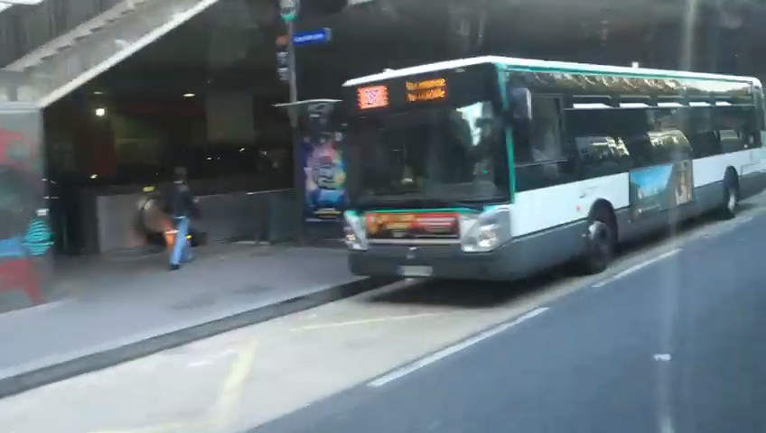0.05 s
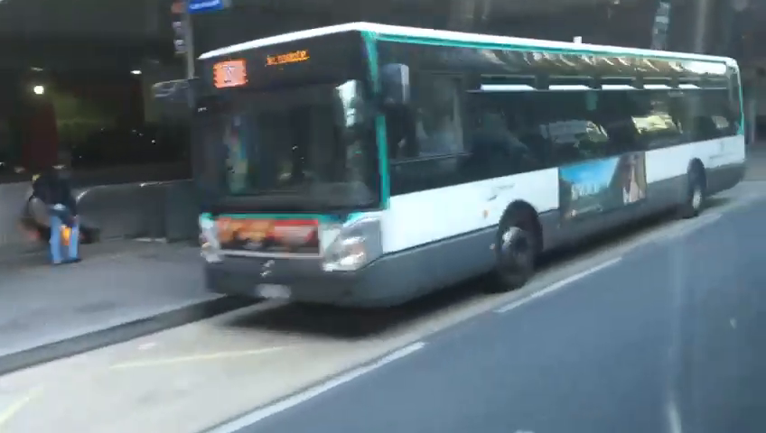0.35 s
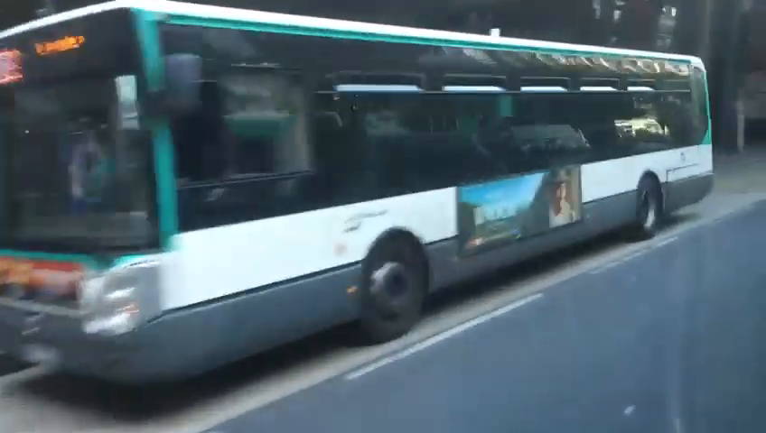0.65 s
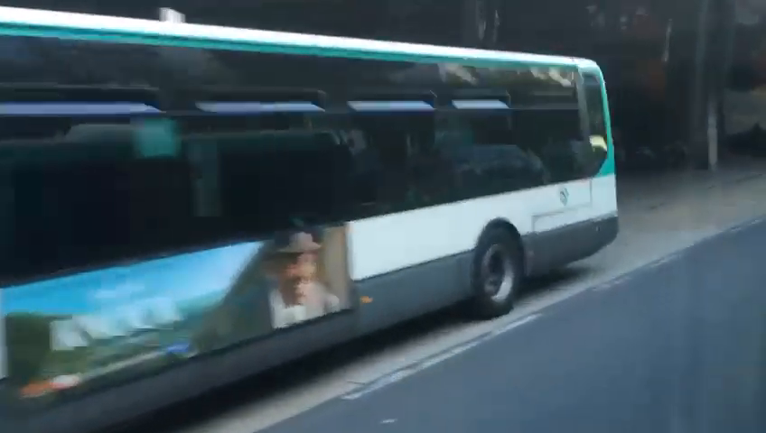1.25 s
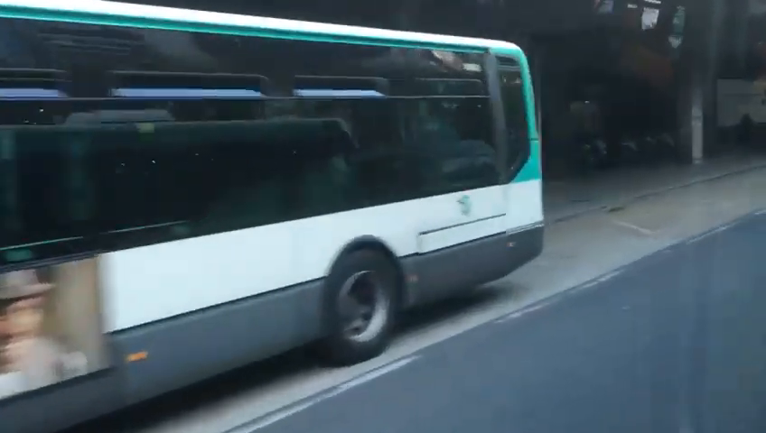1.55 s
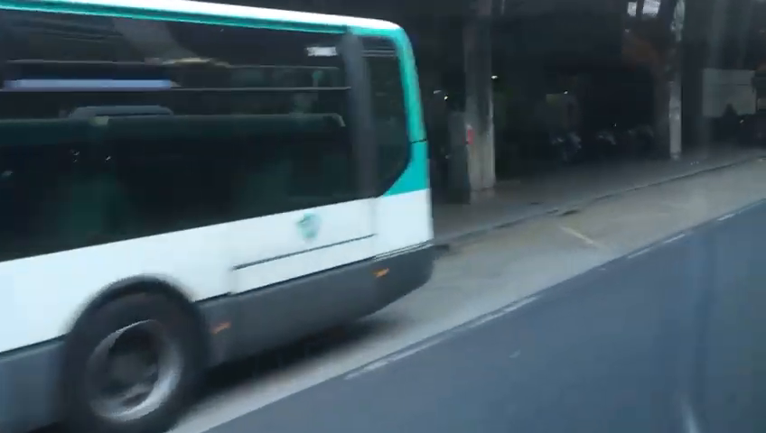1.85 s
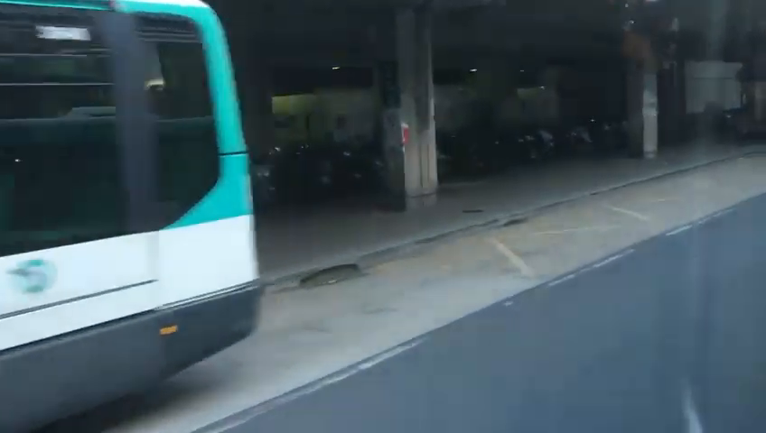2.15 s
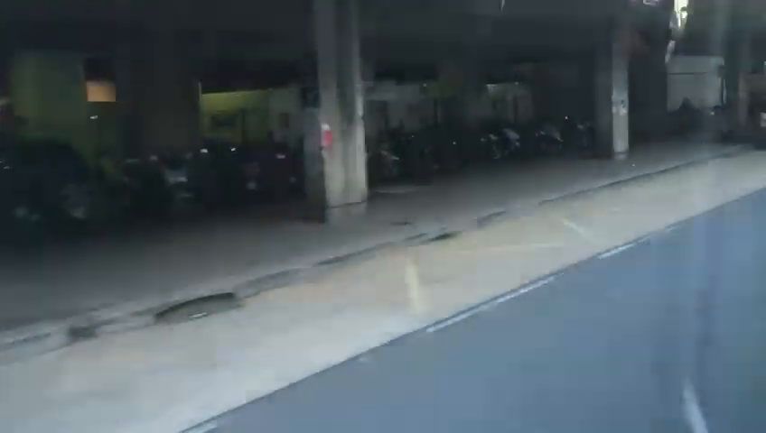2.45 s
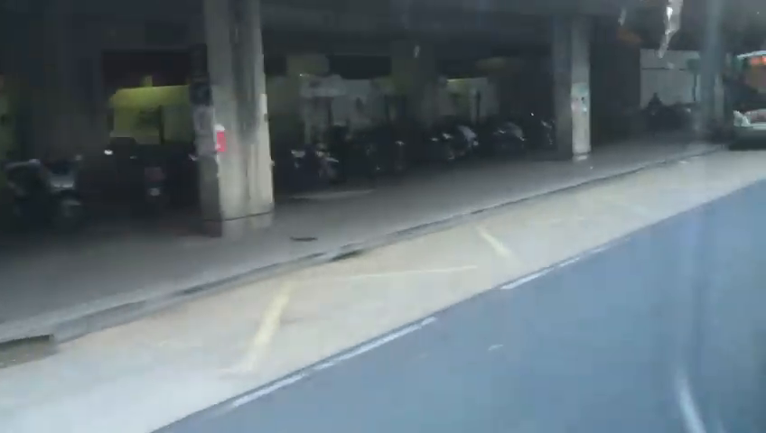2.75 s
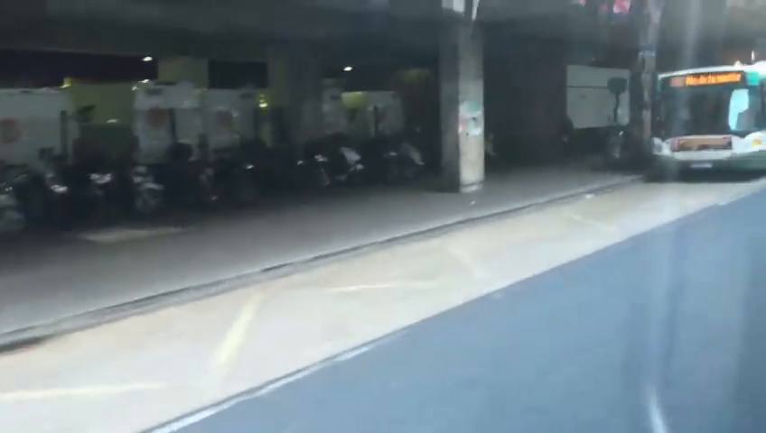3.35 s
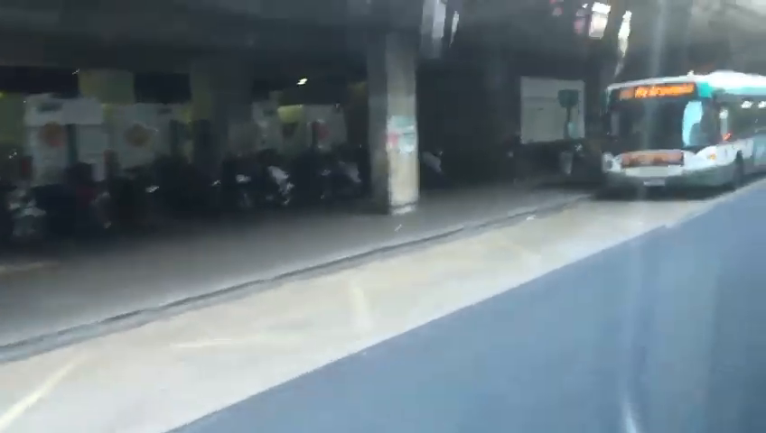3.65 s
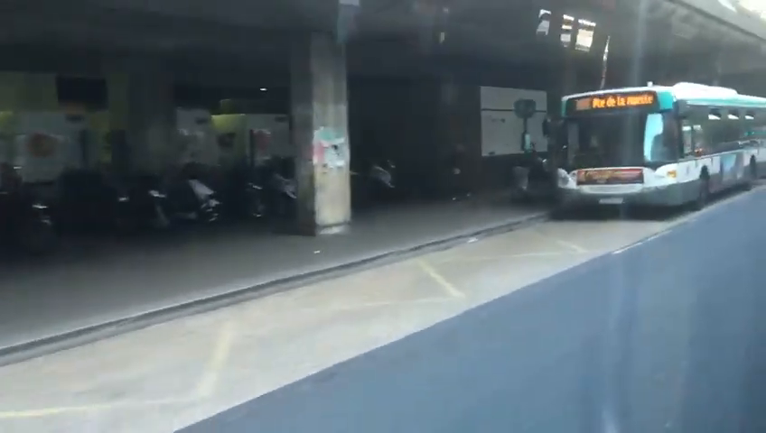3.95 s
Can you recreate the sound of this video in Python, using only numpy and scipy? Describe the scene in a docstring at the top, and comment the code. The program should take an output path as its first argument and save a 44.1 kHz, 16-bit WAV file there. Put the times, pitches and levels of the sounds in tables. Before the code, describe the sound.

A bus engine booms and the road rumbles, heard from inside, with small rattles.

```python
"""A deep engine boom and the rumble of the road fill a city bus that is gently slowing down.
The engine's tones and a thin gear whine sink with the speed, and the cabin makes some pitches louder.
Tyres roar outside. Uneven asphalt jolts the body and shakes the fittings; a panel knocks and creaks.
Trim scuffs, short soft hisses of air come and go, and a fan drones at its own steady pitch."""
import sys
import numpy as np
from scipy.fft import rfft, irfft, next_fast_len
from scipy.io import wavfile
from scipy.ndimage import map_coordinates

SR = 44100
rng = np.random.default_rng(int(sys.argv[2]) if len(sys.argv) > 2 else 0)


def bounce(signal):
    """Save signal as a 16-bit WAV file at the path given by the first command-line argument."""
    frames = np.transpose(np.atleast_2d(signal))
    limited = np.clip(frames, -1, 1)
    pcm = np.round(limited * 32767).astype(np.int16)
    wavfile.write(sys.argv[1], SR, pcm)


N = 176400

# how often the engine fires: time_s, rate_hz
FIRING_RATE = [(0, 52.28), (0.35, 51.23), (0.5, 50.84), (1, 49.75), (1.5, 48.63), (2, 47.48), (2.5, 46.44),
               (3, 45.11), (3.2, 44.7), (3.5, 43.45), (3.75, 41.73), (4, 39.84)]
# boom at the firing rate: time_s, level_db
ENGINE_BOOM = [(0, -17.5), (0.1, -17.5), (0.45, -20), (0.74, -17.5), (0.86, -33), (0.96, -45), (1.1, -23.5),
               (1.8, -27.5), (2.35, -25), (2.6, -28), (2.72, -30), (2.83, -20), (2.98, -33), (3.12, -25.5),
               (3.35, -21.5), (3.95, -24)]
# drone of the driveline, which turns the wheels: time_s, level_db
DRIVELINE_DRONE = [(0, -37), (0.8, -29), (1.6, -27), (2.3, -26), (2.6, -25), (2.75, -32), (2.92, -21),
                   (3.05, -16.5), (3.18, -25.5), (3.4, -21.5), (3.52, -27), (3.7, -19), (3.95, -26)]
# hum of the gearbox: time_s, level_db
GEARBOX_HUM = [(0, -39.5), (.3, -39.5), (.58, -37.5), (.8, -42.5), (1, -46), (1.2, -60), (2.1, -49.5),
               (2.5, -44.5), (3.2, -44.5), (3.7, -37.5), (4, -46)]
# lower singing of meshing gears: time_s, level_db
GEAR_SINGING = [(0, -69), (.45, -54), (.7, -45.5), (1.1, -42.5), (1.45, -53.5), (1.8, -43), (2.15, -42),
                (2.4, -77), (4, -54)]
# thin, high gear whine: time_s, level_db
GEAR_WHINE = [(0, -47.5), (.35, -49.5), (.52, -53.5), (.85, -50), (1.2, -56.5), (1.45, -55.5), (1.7, -60),
              (2.1, -65), (2.45, -54), (2.95, -72), (3.15, -51.5), (3.33, -51.5), (3.48, -46), (3.6, -74),
              (3.73, -40.5), (3.83, -66)]
# weaker engine tones: times_firing_rate, fastest_db, slowest_db
WEAK_TONES = [(1.2, -41.5, -46), (1.4, -29, -46.5), (1.6, -33.5, -29), (2, -51.5, -24.5),
              (2.74, -53.5, -33), (3, -44.5, -54), (3.2, -40, -67), (3.39, -45.5, -36), (3.68, -54, -54),
              (4.25, -58, -36), (5.2, -61, -60), (5.49, -64, -45.5), (5.78, -44.5, -64.5), (6.4, -66, -45),
              (7.31, -75, -46), (8.22, -77, -42.5), (9.57, -57, -44), (10.98, -54, -68),
              (11.56, -68, -50.5), (13.64, -56, -47.5), (17, -61, -64), (18.25, -54.5, -65.5)]
# pitches the cabin lifts or sinks: pitch_hz, width_hz, lift_db
CABIN_RESONANCES = [(149, 3.4, 11), (246.8, 6.6, 12), (275.07, 7.2, 10.5), (329, 12, -7), (372.4, 4.2, 12),
                    (389, 3.59, 2), (424, 7.1, -9), (467, 3.3, 9.5), (497, 18, 6.5), (544, 5, 6),
                    (626, 4.4, 6), (649, 2.5, 6), (783, 24.16, 13)]

# how rough the road is: time_s, roughness_db
ROAD_ROUGHNESS = [(0, 0), (.7, -1), (1.6, -0.5), (1.95, -0.5), (2.35, -0.5), (2.7, 1.5), (3.6, 0.35),
                  (4, -2)]
# soft rush of air: time_s, level_db
AIR_RUSH = [(0, -57.5), (.45, -62), (.85, -60), (1.15, -58.5), (1.9, -59), (2.4, -60), (2.7, -57.5),
            (3.2, -58.5), (4, -59)]
# bumps in the asphalt: peak_s, thud_db, rattle_db
ROAD_JOLTS = [(.09, -56, -34.5), (1.893, -33, -39), (1.948, -29, -52), (2.045, -30.5, -42),
              (2.161, -29.5, -36), (2.52, -25, -39), (2.61, -30, -44), (2.742, -31, -37.5),
              (3.01, -36, -42)]
# knocks of a loose wall panel: start_s, level_db
PANEL_KNOCKS = [(1.834, -36), (1.893, -30), (1.961, -37), (2.041, -29), (2.155, -39), (2.611, -40),
                (2.737, -30)]
# that panel's ringing tones: pitch_hz, relative_db, fade_s (time to fall 60 dB)
PANEL_TONES = [(445, -6, 0.11), (630, -8, 0.078), (750, -3, .08), (840, -6, 0.066), (1024, -9, 0.044),
               (1300, -15, .07), (1430, -10, .07), (1560, -11, 0.062)]
# panel creaks: peak_s, length_s, pitch_hz, level_db
PANEL_CREAKS = [(0.098, 0.11, 1350, -42.5), (2.07, 0.067, 1590, -49), (3.007, 0.04, 692, -39),
                (3.015, 0.026, 810, -38.5)]
# hisses of air: peak_s, length_s, level_db
AIR_HISSES = [(2.05, 0.051, -59), (2.17, 0.23, -56.5), (2.58, 0.13, -56), (2.77, 0.18, -58.5),
              (2.868, 0.048, -52.5), (3.91, 0.065, -48), (3.98, 0.043, -58)]
# scuffs of trim: peak_s, length_s, level_db
TRIM_SCUFFS = [(3.255, 0.041, -44), (3.92, 0.038, -47)]

# colour (mix of low and high) of the road's rumble: pitch_hz, relative_db
RUMBLE_COLOUR = [(15, -28), (28, -10), (42, -11), (60, -6.5), (78, -1.5), (100, -4.5), (130, -10.5),
                 (180, -17), (300, -31), (600, -68)]
# booming bus body: pitch_hz, relative_db
BODY_COLOUR = [(80, -8), (150, 3), (215, 7), (290, -2.5), (380, -9), (600, -15.5), (1200, -45.5)]
# roaring tyres: pitch_hz, relative_db
TYRE_COLOUR = [(150, -24), (350, 3.5), (620, 1), (820, -3.5), (1050, -2), (1180, -5.5), (1340, -4.5),
               (1900, -9.5), (2950, -15.5), (3800, -22), (5000, -47), (8000, -51)]
# rushing air: pitch_hz, relative_db
AIR_COLOUR = [(2470, -48), (4200, 2.5), (4500, 2.5), (5000, -4), (6040, 1), (7750, -4.5), (8950, -1),
              (10400, -5.5), (11200, -2.5), (11900, -15), (15500, -41), (22000, -120)]
# thud of the jolted body: pitch_hz, relative_db
THUD_COLOUR = [(60, -3), (140, -15), (220, 6), (320, -13), (450, -12.5), (700, -12.5), (1500, -51)]
# loose fittings: pitch_hz, relative_db
RATTLE_COLOUR = [(200, -20), (450, -14), (700, 7), (1100, 17), (1500, -5.5), (2500, 0.5), (4000, -15),
                 (6300, -20), (11000, -28)]
# short hisses: pitch_hz, relative_db
HISS_COLOUR = [(2000, -26), (3500, -1.5), (5000, -3), (6300, 2.5), (7800, -3), (9200, 0.5), (11500, -6)]
# scuffing trim: pitch_hz, relative_db
SCUFF_COLOUR = [(800, -27), (1800, 0), (2800, 11), (3900, 2), (5000, -18), (6500, -8), (11000, -26)]


def engine():
    """Engine and gear tones follow one speed; the weaker ones swell or dip at the cabin's resonances."""
    firing_hz = curve(FIRING_RATE)
    cycles = np.cumsum(firing_hz) / SR
    slowed = (firing_hz.max() - firing_hz) / np.ptp(firing_hz)  # 0 at the fastest, 1 at the slowest
    out = amp(curve(ENGINE_BOOM)) * tone(cycles, waver_db=1, drift_rad=0.13)
    out += amp(curve(DRIVELINE_DRONE)) * tone(1.8 * cycles, waver_db=-0.5, drift_rad=0.16)
    out += amp(curve(GEARBOX_HUM)) * tone(6.81 * cycles, waver_db=1, drift_rad=0.075)
    out += amp(curve(GEAR_SINGING)) * tone(12.79 * cycles, waver_db=-1, drift_rad=0.45)
    out += amp(curve(GEAR_WHINE)) * tone(37.42 * cycles, waver_db=-0.2, drift_rad=0.25)
    for multiple, fastest_db, slowest_db in WEAK_TONES:
        level_db = fastest_db + (slowest_db - fastest_db) * slowed
        pitch_hz = multiple * firing_hz
        lift_db = sum(db / (1 + ((pitch_hz - hz) / width) ** 2) for hz, width, db in CABIN_RESONANCES)
        out += amp(level_db + lift_db) * tone(multiple * cycles, waver_db=3, drift_rad=0.34)
    return out


def road():
    """Floor rumble, body boom and tyre roar grow on rougher asphalt, over a soft rush of air."""
    rough_db = curve(ROAD_ROUGHNESS)
    rumble = amp(-26.5 + 0.43 * rough_db) * noise(RUMBLE_COLOUR)
    body = amp(-36.5 + 1.6 * rough_db + 0.97 * wobble(17)) * noise(BODY_COLOUR)
    tyres = amp(-37 + 0.66 * rough_db + 0.87 * wobble(25)) * noise(TYRE_COLOUR)
    air = amp(curve(AIR_RUSH) + 0.35 * wobble(8.4) + 0.96 * wobble(150)) * noise(AIR_COLOUR)
    return rumble + body + tyres + air


def jolts(rise_s=0.0077, fade_s=0.25):
    """Each bump thuds in the bus body and sets loose fittings chattering."""
    thud, rattle = np.zeros(N), np.zeros(N)
    for peak_s, thud_db, rattle_db in ROAD_JOLTS:
        since_peak = clock() - peak_s
        rise = np.clip(1 + since_peak / rise_s, 0, 1)
        fade = amp(-60 * np.maximum(since_peak, 0) / fade_s)
        thud += amp(thud_db) * rise * fade
        rattle += amp(rattle_db) * rise * fade
    chatter = unit(amp(4.1 * wobble(170)) * noise(RATTLE_COLOUR))
    return thud * noise(THUD_COLOUR) + rattle * chatter


def knocks(rise_s=0.0034, clack_fade_s=0.095):
    """A loose wall panel knocks against its frame several times: a dull clack and a short ring."""
    out, grit = np.zeros(N), noise(RATTLE_COLOUR)
    age = np.arange(SR // 2) / SR
    for start_s, level_db in PANEL_KNOCKS:
        span = round(start_s * SR) + np.arange(len(age))
        ring = np.zeros(len(age))
        for pitch_hz, relative_db, fade_s in PANEL_TONES:
            fade = amp(relative_db + rng.normal(0, 2) - 60 * age / fade_s)
            ring += fade * np.sin(2 * np.pi * (pitch_hz * age + rng.random()))
        clack = amp(-6.5 - 60 * age / clack_fade_s) * grit[span]
        rise = np.minimum(age / rise_s, 1)
        out[span] += amp(level_db) * rise * (ring + clack)
    return out


def creaks():
    """A flexing panel gives brief, rough tones."""
    out = np.zeros(N)
    for peak_s, length_s, pitch_hz, level_db in PANEL_CREAKS:
        cycles = pitch_hz * clock() + 0.2 * wobble(90)
        out += amp(level_db) * swell(peak_s, length_s) * tone(cycles, waver_db=-2, drift_rad=0.32)
    return out


def scuffs():
    """The cabin's trim rubs with a short, scratchy sound."""
    return puffs(TRIM_SCUFFS, SCUFF_COLOUR, grain_db=-5)


def hisses():
    """Air hisses in short, soft puffs."""
    return puffs(AIR_HISSES, HISS_COLOUR, grain_db=2)


def fan(pitch_hz=120, level_db=-32):
    """A ventilation fan keeps its own speed while the engine's tones sink."""
    return amp(level_db) * tone(pitch_hz * clock(), waver_db=2.5, drift_rad=0.25)


def amp(db):
    """Turn decibels into a number to multiply by."""
    return 10 ** (np.asarray(db) / 20)


def unit(x):
    """Scale a sound to an average strength (rms) of 1."""
    return x / np.sqrt(np.mean(x ** 2) + 1e-20)


def clock():
    """The time of each sample in seconds."""
    return np.arange(N) / SR


def curve(rows):
    """Join (time_s, value) points with straight lines."""
    return np.interp(clock(), *np.transpose(rows))


def wobble(rate_hz):
    """A smooth curve through rate_hz random points a second."""
    return map_coordinates(rng.standard_normal(2048), [clock() * rate_hz], mode="wrap")


def swell(peak_s, length_s):
    """A bell-shaped rise and fall."""
    return np.exp(-2 * ((clock() - peak_s) / length_s) ** 2)


def tone(cycles, waver_db, drift_rad):
    """A pure tone whose loudness and pitch waver a little."""
    strength = np.sqrt(2) * amp(waver_db * wobble(4.997))
    return strength * np.sin(2 * np.pi * (cycles + rng.random()) + drift_rad * wobble(14))


def noise(colour, ripple_spacing_hz=35.02):
    """Noise of a given colour, with fine peaks and dips from the cabin's echoes."""
    size = next_fast_len(N + 8192)
    hz = np.fft.rfftfreq(size, 1 / SR)
    colour_hz, colour_db = np.transpose(colour)
    smooth_db = np.interp(np.log(hz + 1), np.log(colour_hz), colour_db)
    ripple = map_coordinates(rng.standard_normal(2048), [hz / ripple_spacing_hz], mode="wrap")
    ripple_db = 2.5 * np.clip(hz / 1000, 0, 1) * ripple  # shallower in the bass
    white = rfft(rng.standard_normal(size))
    return unit(irfft(white * amp(smooth_db + ripple_db), size)[:N])


def puffs(events, colour, grain_db):
    """Short swells of grainy noise."""
    strength = sum(amp(level_db) * swell(peak_s, length_s) for peak_s, length_s, level_db in events)
    return strength * unit(amp(grain_db * wobble(300)) * noise(colour))


def scene():
    """Everything as heard from a seat by the window."""
    return (engine() + fan() + road() + jolts() + knocks() + hisses() + scuffs() + creaks())[None]


def record(dry, top_hz=11950):
    """Cut away the treble above top_hz."""
    size = next_fast_len(N + 8192)
    kept = np.fft.rfftfreq(size, 1 / SR) < top_hz
    return irfft(rfft(dry, size) * kept, size)[..., :N]


dry = scene()
out = record(dry)
bounce(out)
```